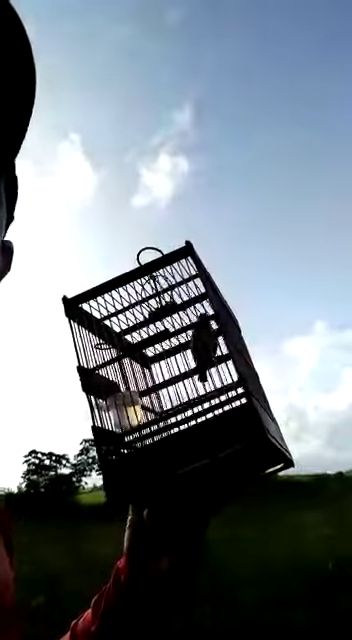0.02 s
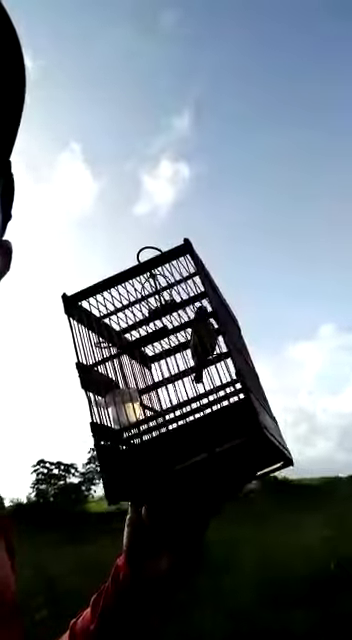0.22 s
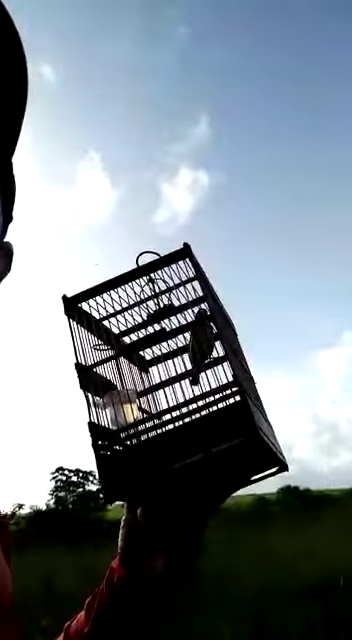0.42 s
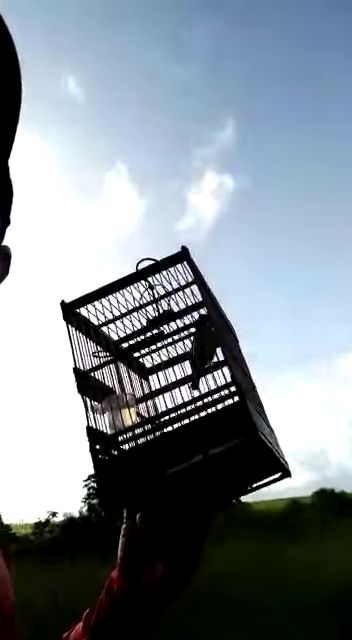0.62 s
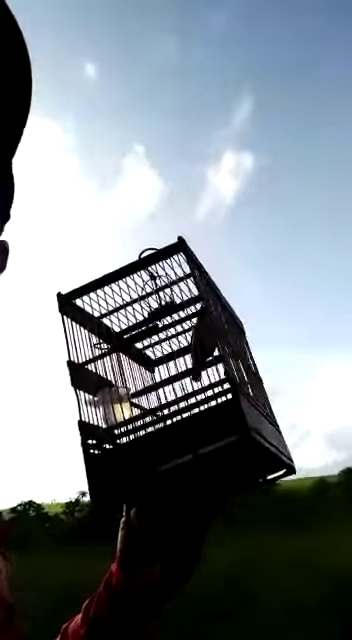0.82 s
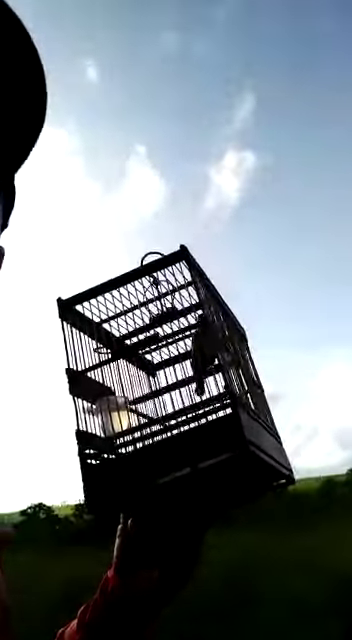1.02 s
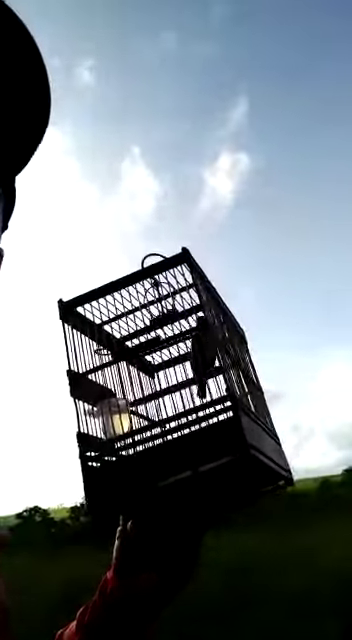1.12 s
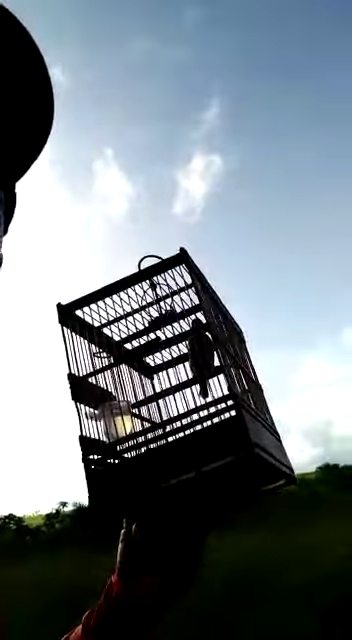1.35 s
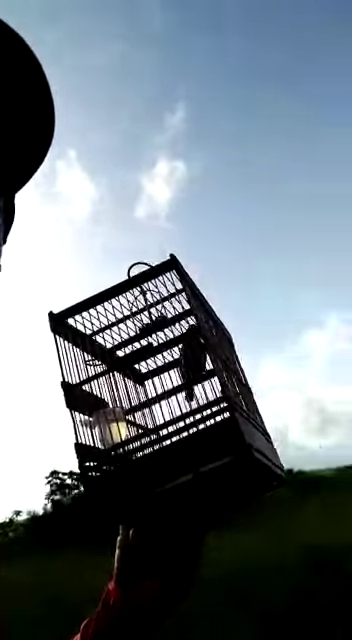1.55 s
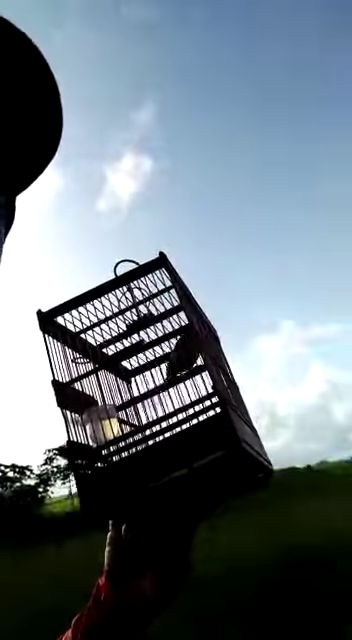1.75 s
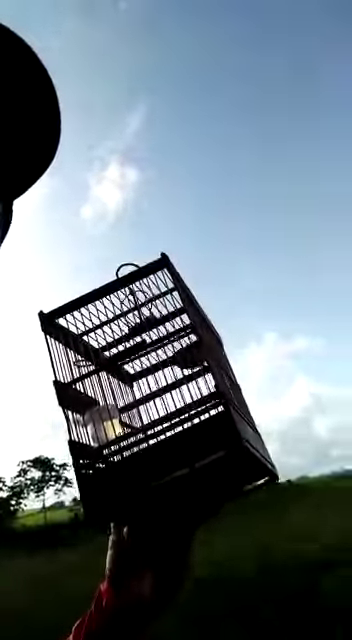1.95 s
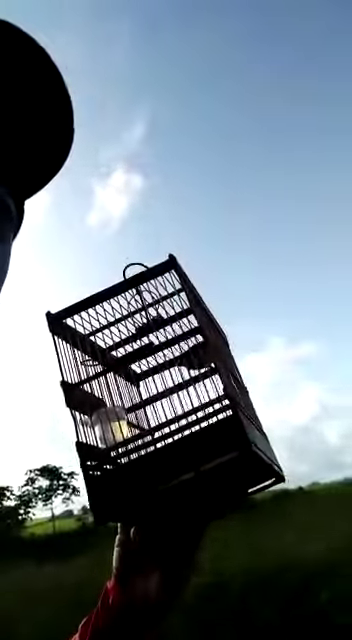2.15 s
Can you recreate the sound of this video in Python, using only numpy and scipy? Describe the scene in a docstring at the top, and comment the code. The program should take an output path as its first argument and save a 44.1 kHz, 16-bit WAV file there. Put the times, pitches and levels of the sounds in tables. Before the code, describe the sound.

A small caged bird sings five loud falling whistles close by, over faint cage ticks outdoors

```python
"""Caged seedeater in open country

Five loud falling whistles, close by and to the right: gliding sines with faint harmonics and breathy air.
The second and fifth start high and break into a fast buzz of pitch flutter as they drop;
the first has a brief catch where two tones beat. Weak reflections follow the song.
The hand-held cage ticks (noise bursts) and bumps (ringing sines); shaped noise makes the soft rustle,
the handling, the open field and the light wind on the microphone."""
import sys
import numpy as np
from scipy import signal
from scipy.fft import rfft, irfft
from scipy.io import wavfile

SR = 44100
rng = np.random.default_rng(int(sys.argv[2]) if len(sys.argv) > 2 else 0)


def wav_record(signal):
    """Record a signal, one row per channel, as 16-bit PCM in the file named by sys.argv[1]."""
    frames = np.transpose(np.atleast_2d(signal))
    bounded = np.clip(frames, -1, 1)
    # unit amplitude maps onto the largest positive 16-bit level
    quanta = np.round(bounded * 32767).astype(np.int16)
    wavfile.write(sys.argv[1], SR, quanta)


N = 97020  # samples, 2.2 s


def undb(db):
    """Decibels to gain."""
    return 10 ** (np.asarray(db) / 20)


def on_log(points, hz):
    """Read (Hz, value) points on a log-frequency axis."""
    p = np.array(points, float)
    return np.interp(np.log(np.maximum(hz, 1)), np.log(p[:, 0]), p[:, 1])


def bins():
    """Frequencies of the spectrum in Hz."""
    return np.arange(N // 2 + 1) * SR / N


def noise(colour, tilt_db=0, channels=2):
    """Independent coloured noise per channel, overall rms 1; the tilt is in dB per octave."""
    tilt = tilt_db * np.log2(np.clip(bins(), 200, 6000))
    spectrum = rfft(rng.standard_normal((channels, N)))
    x = irfft(spectrum * undb(on_log(colour, bins()) + tilt), N)
    return x / x.std()


def walk(rate_hz):
    """Smooth random curve with spread 1, moving mostly slower than rate_hz."""
    x = irfft(rfft(rng.standard_normal(N)) * np.exp(-2 * (bins() / rate_hz) ** 2), N)
    return x / x.std()


def swell(t, at, half):
    """A smooth Gaussian rise and fall around a moment."""
    return np.exp(-((t - at) / half) ** 2)


def strike(t, at, decay, rise=0.00026):
    """Envelope of an impact: a quick rise and an exponential fall, times in seconds."""
    age = np.maximum(t - at, 0)
    return (1 - np.exp(-age / rise)) * np.exp(-age / decay)


def pan(db):
    """Left and right gains for a level difference."""
    return undb([[db / 2], [-db / 2]])


def from_left(colour, tilt_db=0):
    """Noise that reaches the left ear first, mixed with a diffuse share independent in each ear."""
    lead_s, diffuse = 0.0004194, 0.68  # diffuse: gain relative to the direct noise
    source = noise(colour, tilt_db, channels=1)[0]
    late = irfft(rfft(source) * np.exp(-2j * np.pi * bins() * lead_s), N)
    direct = np.array([source, late])
    return (direct + diffuse * noise(colour, tilt_db)) / np.hypot(1, diffuse)


def open_country():
    """The quiet field: steady noise, strongest in the lows."""
    # field spectrum before levelling: hz, level_db
    field_colour = [(25, -29), (45, -11.5), (70, -0.5), (110, 0), (220, -13), (1200, -23.5), (4800, -27),
                    (5700, -12), (6500, -29), (15500, -33)]
    return undb(-64) * noise(field_colour)


def wind(t):
    """Puffs of low noise, as wind touches mostly the right port of the microphone."""
    # puffs: centre_s, half_length_s, level_db
    puffs = [(0.618, 0.02, -50.5), (1.914, 0.026, -49), (2.016, 0.063, -51), (2.154, .1, -54.5)]
    # puff spectrum before levelling: hz, level_db
    puff_colour = [(25, -29), (45, -4), (70, 4.5), (130, 3.5), (220, -4), (400, -25), (1000, -61)]
    gusts = sum(undb(db) * swell(t, at, half) for at, half, db in puffs)
    return gusts * noise(puff_colour) * undb([[-15], [0]])


def handling(t):
    """Soft low noise that swells as the cage is handled, its level slightly unsteady."""
    # swells: centre_s, half_length_s, level_db
    swells = [(0.435, .17, -62), (1.277, .07, -60.5), (1.995, 0.36, -66.5)]
    # handling spectrum before levelling: hz, level_db
    swell_colour = [(120, -20), (330, -0.5), (650, 0.5), (3000, -42.5)]
    level = sum(undb(db) * swell(t, at, half) for at, half, db in swells)
    return level * undb(1.8 * walk(50)) * from_left(swell_colour)


def rustle(t):
    """Soft noise from the left that comes and goes, made grainy by a fast random level."""
    # rustle level: time_s, level_db
    rustle_level = [(0, -77), (.15, -70), (.28, -59.5), (.42, -59.5), (.49, -57), (.55, -59), (.6, -55.5),
                    (.79, -63.5), (1.05, -61.5), (1.27, -56), (1.46, -61.5), (1.6, -54), (1.86, -54),
                    (1.98, -64), (2.2, -58)]
    # rustle spectrum before levelling: hz, level_db
    rustle_colour = [(140, -8), (350, -3.5), (650, -6.5), (1200, -2.5), (2000, -5), (3000, -1.5),
                     (4500, -7), (7000, -18.5), (9000, -26), (15000, -25.5)]
    level_db = np.interp(t, *np.array(rustle_level).T)
    return undb(level_db + 0.76 * walk(120)) * from_left(rustle_colour)


def cage(t):
    """Noise bursts for dry ticks and scrapes of beak, perch and bars; damped sines for dull frame bumps."""
    # ticks: start_s, level_db before the envelope, decay_s, left_minus_right_db, tilt_db_per_octave
    ticks = [(0.464, -47, 0.018, 0.5, 5.5), (0.481, -47.5, 0.0099, 4.5, -2), (0.512, -40, 0.0025, 0, 7.5),
             (0.572, -54, 0.0084, -22.5, 9.5), (.84, -46, 0.0015, -20, 6),
             (1.5691, -20.5, 0.00094, 8.5, 4.5), (1.632, -43.5, 0.0079, 11, -1),
             (2.005, -51, 0.0059, 12, -1.5), (2.042, -49.5, 0.0097, 8.5, -3.5),
             (2.11, -44, 0.01, 8.5, -3.5), (2.132, -48, 0.019, 5, -1)]
    # tick spectrum before tilt and levelling: hz, level_db
    tick_colour = [(150, -13), (450, 2), (1100, -0.5), (2000, 0.5), (3000, 5.5), (4500, -7), (7500, -16.5),
                   (15000, -37.5)]
    # bumps: start_s, level_db before the envelope, ring_hz, decay_s, left_minus_right_db
    bumps = [(1.579, -35, 308, 0.0021, 19), (1.634, -39.5, 317, 0.0041, 9.5),
             (1.708, -44.5, 346, 0.0067, 9)]
    out = np.zeros((2, N))
    for at, db, decay, side_db, tilt_db in ticks:
        burst = strike(t, at, decay) * from_left(tick_colour, tilt_db)
        out += undb(db) * pan(side_db) * burst
    for at, db, hz, decay, side_db in bumps:
        ring = strike(t, at, decay) * np.sin(2 * np.pi * hz * (t - at))
        out += undb(db) * pan(side_db) * ring
    return out


def scatter(x, t, t60, delay):
    """Diffuse reflections: x convolved with decaying noise, different in each ear; times in seconds."""
    tail = rng.standard_normal((2, N)) * np.exp(-np.log(1000) * t / t60) * (t > delay)
    tail = tail / np.sqrt(np.sum(tail ** 2) / 2)  # mean energy 1 per ear
    return signal.fftconvolve(x[None], tail, axes=1)[:, :N]


def flutter(t):
    """Pitch offset (Hz) and gain of the syrinx: jagged, uneven trills over a slight waver.

    Each upward flick of pitch dips in level where the trill has tremolo."""
    # trills: centre_s, half_length_s, mean_rate_hz, swing_hz before cusp and roughness, tremolo_depth (0-1)
    trills = [(0.221, .0015, 149.9, 218.7, .6), (0.583, 0.0039, 300, 277.6, .6),
              (0.684, .012, 154.6, 139.1, 0), (0.721, 0.018, 283.8, 287, 0), (0.738, .018, 268, 100, 0.3),
              (1.608, 0.041, 140.4, 69.9, 0.1), (1.6605, .016, 151.5, 372, .3),
              (1.684, 0.016, 291, 79.5, 0.1)]
    uneven, cusp = .15, .4  # spread of the rate, sharpness of the flicks
    rough, rough_rate_hz = .25, 650
    hz = 5.2 * walk(210) + 11 * walk(390)  # slower waver and fast jitter
    gain = undb(.25 * walk(140))  # shimmer
    for at, half, rate, swing, depth in trills:
        turns = np.cumsum(rate * (1 + uneven * walk(rate))) / SR
        angle = 2 * np.pi * (turns - np.interp(at, t, turns))  # an upward flick peaks at the centre
        flick = np.cos(angle) + cusp * np.cos(2 * angle)
        window = swell(t, at, half)
        hz = hz + swing * window * (flick + rough * walk(rough_rate_hz))
        dip = np.tanh(flick + 2 * rough * walk(rough_rate_hz))
        gain = gain * (1 - depth * window * dip)
    return hz, gain


def second_voice(t, phase):
    """The other side of the syrinx joins briefly above the whistle and breaks it into fast beats."""
    # entries: centre_s, half_length_s, hz_above_whistle, level_db relative to the whistle
    entries = [(.2245, .004, 880, -3), (.726, .022, 560, -18), (1.657, .022, 420, -10)]
    voice = 0
    for at, half, hz, db in entries:
        voice = voice + undb(db) * swell(t, at, half) * np.sin(phase + 2 * np.pi * hz * (t - at))
    return voice


def overtones(pitch, phase, colour_db):
    """Faint 2nd to 4th harmonics, each set by the frequency where it falls and flickering in level."""
    # base level under the whistle: harmonic_hz, level_db
    overtone_levels = [(5900, -18.5), (6500, -35.5), (7450, -43), (8000, -50.5), (8600, -38.5), (9500, -53),
                       (11300, -52.5), (12000, -46.5), (13000, -45), (15700, -46)]
    total = 0
    for k in (2, 3, 4):
        flicker_db = 4 * walk(55)
        fall_db = -5 * (k - 2)
        db = on_log(overtone_levels, k * pitch) + colour_db + fall_db + flicker_db
        total = total + undb(db) * np.sin(k * phase)
    return total


def bird(t):
    """Nearly pure gliding whistles with harmonics and air; the left ear is shaded differently at each pitch."""
    # one curve per note: time_s, pitch_hz before flutter, level_db before tremolo and ear shading
    notes = [
        [(.137, 4427, -54.5), (.175, 4360, -35.5), (.2, 4258, -24), (.214, 4070, -21), (.224, 3725, -23),
         (.229, 4180, -25), (.238, 4120, -27.5), (.275, 3890, -22), (.37, 3839, -15.5), (.44, 3650, -13.5),
         (.456, 3584, -17), (.465, 3584, -38)],
        [(.579, 4557, -44), (.588, 5636, -26), (.597, 5944, -26.5), (.615, 5733, -22), (.66, 5654, -17.5),
         (.7, 5565, -14), (.714, 5206, -17), (.738, 4920, -14.5), (.744, 4660, -15.5), (.756, 4696, -13),
         (.76, 4330, -19), (.785, 4110, -16), (.835, 4051, -18.5), (.843, 4200, -34.5)],
        [(.981, 4960, -52), (.995, 4576, -22), (1.025, 4134, -15), (1.06, 3632, -14.5), (1.095, 3361, -13),
         (1.13, 3150, -16.5), (1.19, 3032, -19.5), (1.215, 2900, -37.5)],
        [(1.267, 4336, -56), (1.278, 4516, -22.5), (1.294, 4450, -13.5), (1.325, 4044, -14.5),
         (1.375, 3612, -14.5), (1.42, 3372, -13.5), (1.466, 3426, -14.5), (1.476, 3300, -17.5),
         (1.482, 3580, -41)],
        [(1.556, 5980, -42.5), (1.578, 5690, -25), (1.598, 5774, -20.5), (1.626, 5456, -23),
         (1.636, 6010, -16.5), (1.638, 5480, -20), (1.663, 5270, -20), (1.69, 4657, -13.3), (1.71, 4200, -16.5),
         (1.735, 4067, -13), (1.762, 4109, -18), (1.772, 4280, -30)],
    ]
    # per note, as the bird turns its head: left_ear_db, harmonics_db
    note_colour = [(-7.5, -2.5), (-1, -2.5), (-1, -6), (0, -4.5), (3, 1)]
    # left ear against the right: hz, level_db
    left_shade = [(2900, -11), (3450, -28), (3600, -17.5), (3850, -13), (4250, -8.5), (4600, -17.5),
                  (4900, -20.5), (5200, -9.5), (5600, -3), (5950, -15.5), (13000, 1.5)]
    # phase by which the left ear leads: hz, lead_radians
    left_phase = [(3300, 1.5), (3600, 0), (3850, -0.26), (4400, -1.6), (5250, 0.24), (5800, -1.94),
                  (8000, 2)]
    # spectrum of the breathy air before levelling: hz, level_db
    air_colour = [(2500, -14), (4000, -3.5), (7000, -11), (9000, -14), (11000, -7.5), (15500, -10.5)]
    edge_s = .002  # fade just outside each note's first and last points
    wobble, tremolo = flutter(t)
    song, effort = np.zeros((2, N)), np.zeros(N)
    for note, (left_db, overtone_db) in zip(notes, note_colour):
        s, hz, db = np.array(note, float).T
        gate = np.clip(1 + np.minimum(t - s[0], s[-1] - t) / edge_s, 0, 1)
        loud = np.interp(t, s, undb(db)) * np.sin(gate * np.pi / 2) ** 2 * tremolo
        pitch = np.interp(t, s, hz) + wobble
        phase = 2 * np.pi * np.cumsum(pitch) / SR
        tone = np.sin(phase) + second_voice(t, phase) + overtones(pitch, phase, overtone_db)
        song += np.sqrt(2) * loud * tone * undb([[left_db], [0]])
        effort += loud
    shade = undb(on_log(left_shade, bins())) * np.exp(1j * on_log(left_phase, bins()))
    left = irfft(rfft(song[0]) * shade, N)
    air = undb(-57.5) * effort * noise(air_colour)  # hiss that follows the whistle's loudness
    return np.array([left, song[1]]) + air


def scene():
    """The song with its weak reflections, the cage, the handling, the rustle, the wind and the field."""
    t = np.arange(N) / SR
    background = open_country() + wind(t) + handling(t) + rustle(t)
    song = bird(t)
    short_echo = undb(-39) * scatter(song[1], t, t60=.06, delay=.012)
    long_echo = undb(-38) * scatter(song[1], t, t60=.25, delay=.008)
    return background + cage(t) + short_echo + long_echo + song


def record(dry):
    """The recorder cuts the top with a steep low-pass at 15.8 kHz."""
    low_pass = signal.ellip(8, .2, 70, 15800, fs=SR, output="sos")
    return signal.sosfilt(low_pass, dry)


dry = scene()
out = record(dry)
wav_record(out)
```